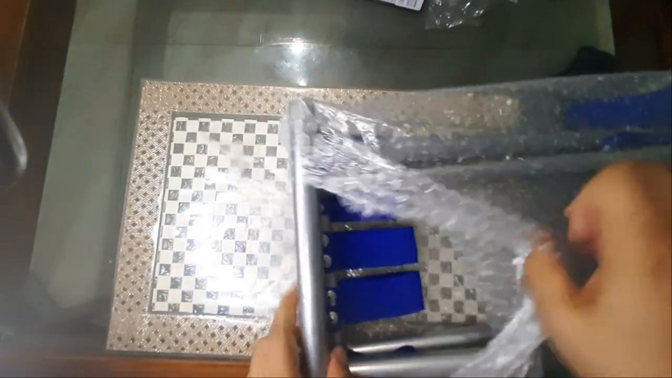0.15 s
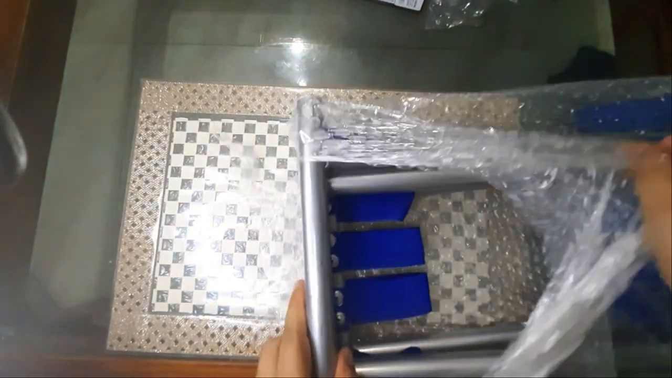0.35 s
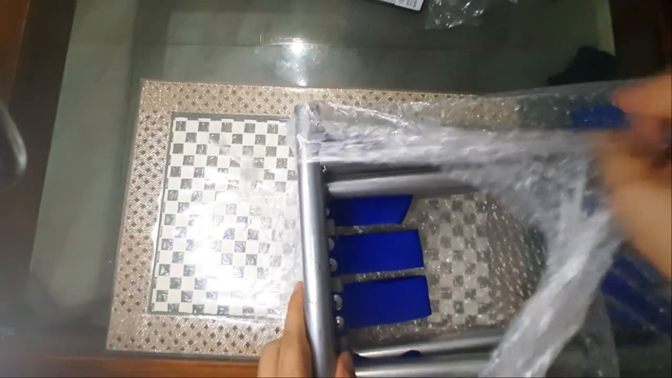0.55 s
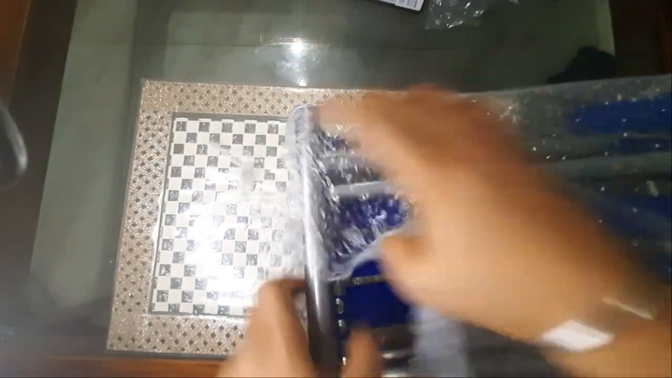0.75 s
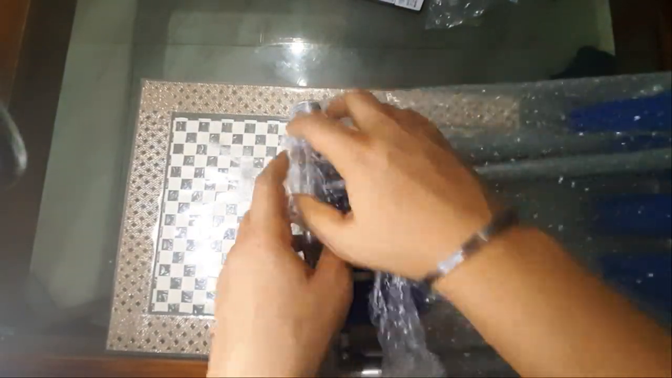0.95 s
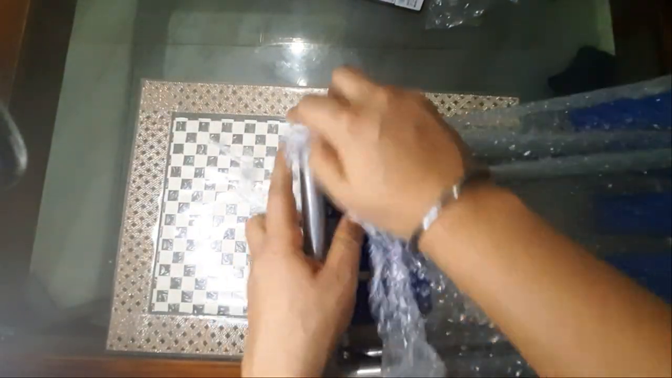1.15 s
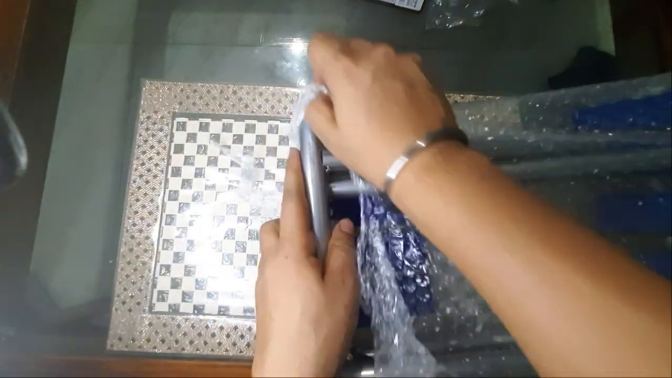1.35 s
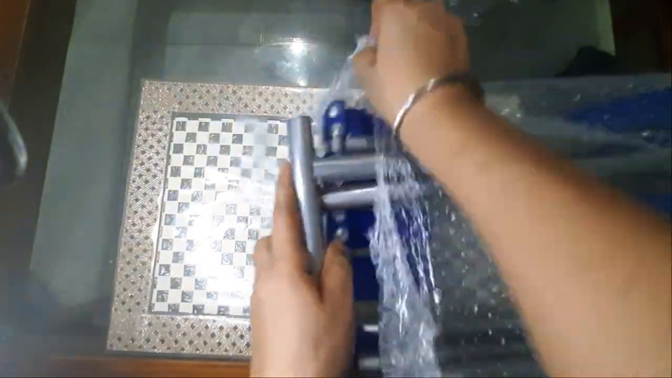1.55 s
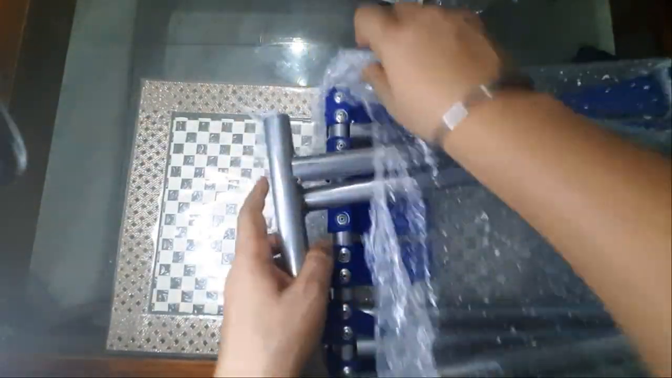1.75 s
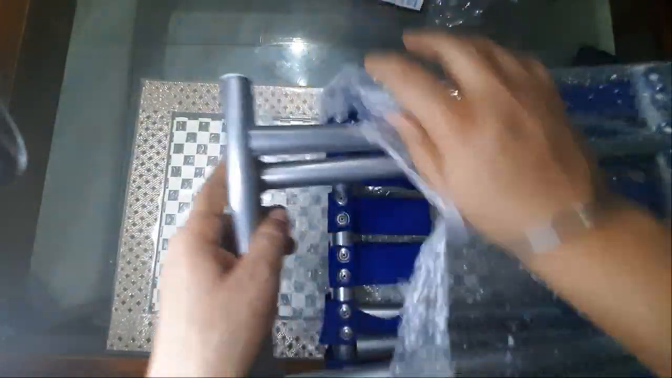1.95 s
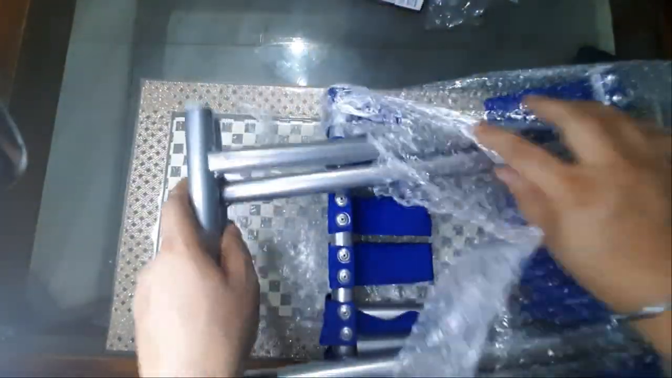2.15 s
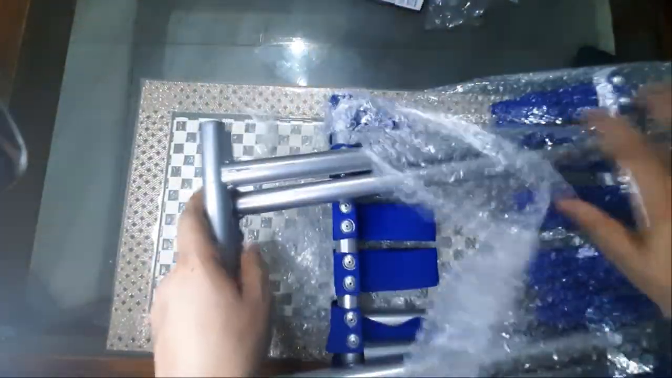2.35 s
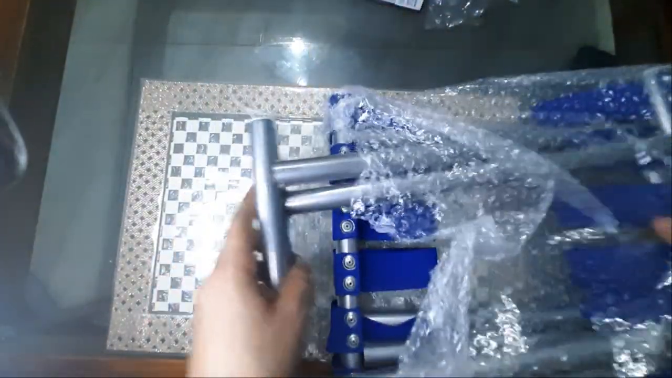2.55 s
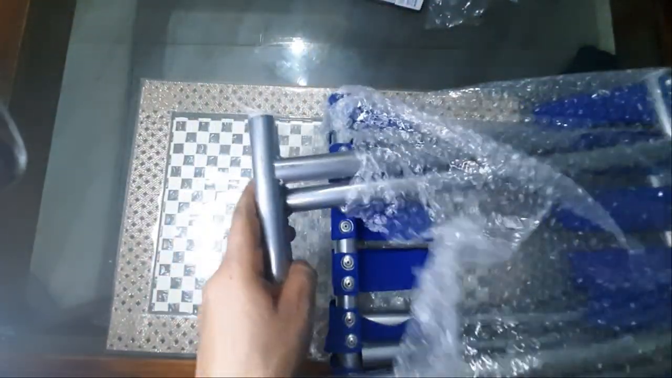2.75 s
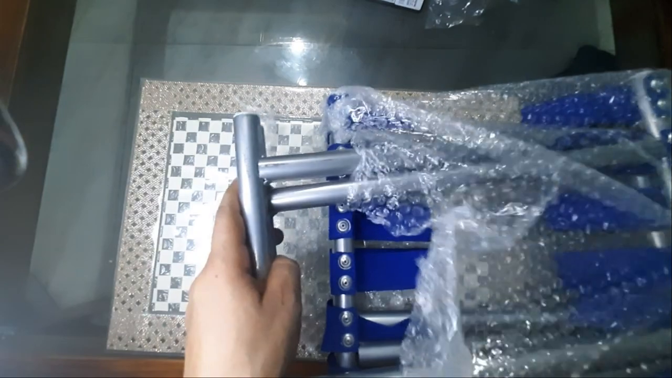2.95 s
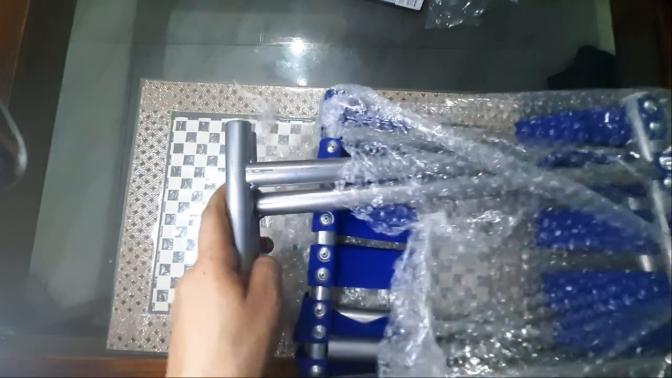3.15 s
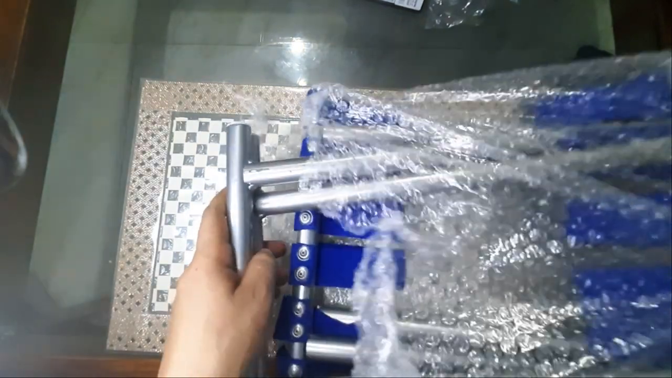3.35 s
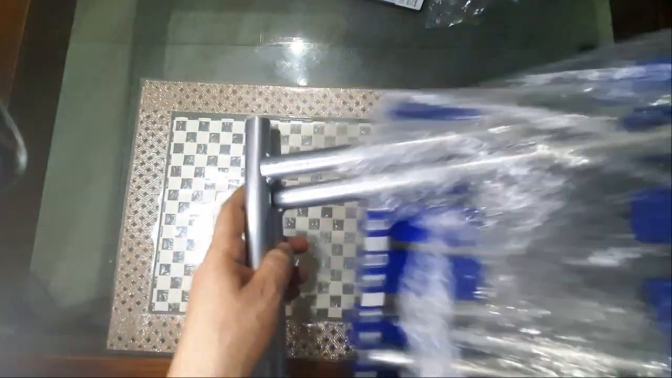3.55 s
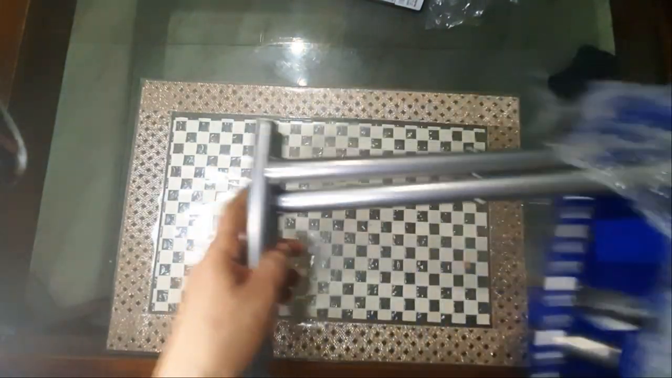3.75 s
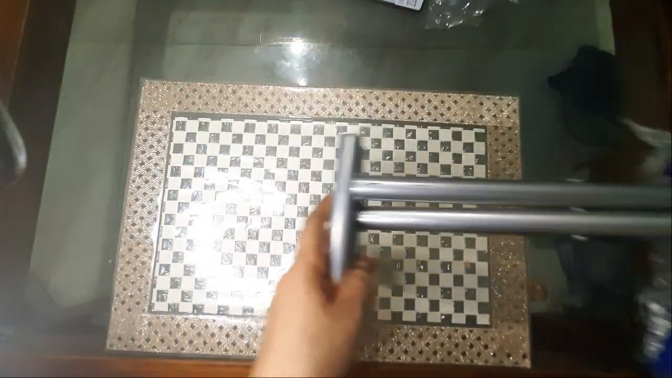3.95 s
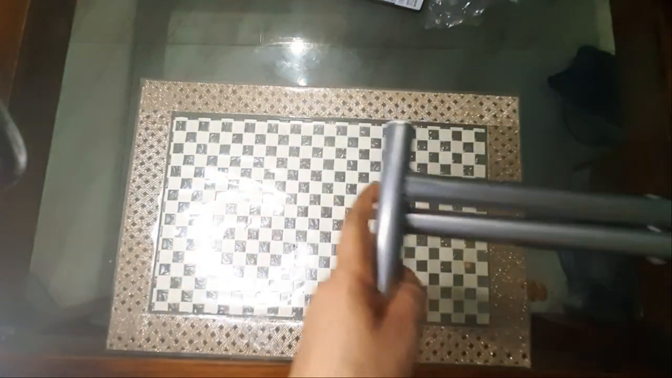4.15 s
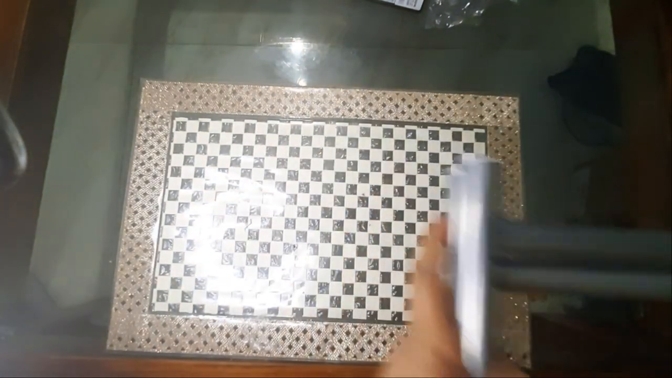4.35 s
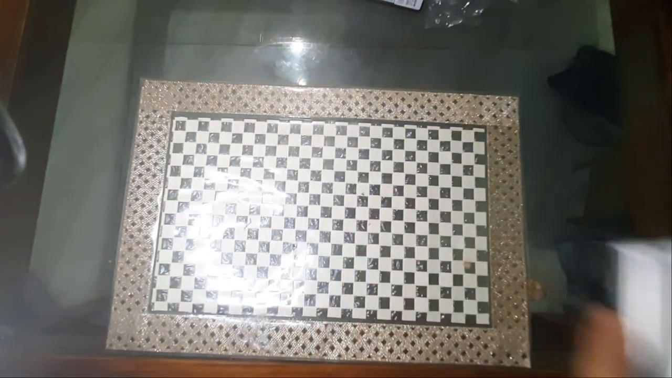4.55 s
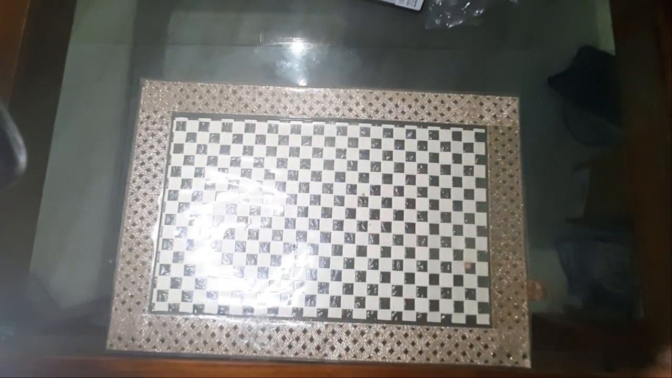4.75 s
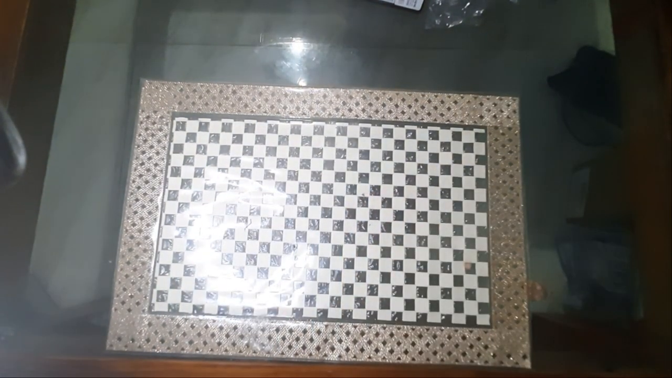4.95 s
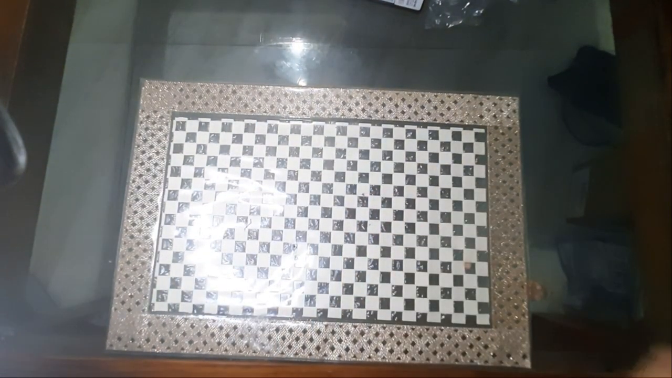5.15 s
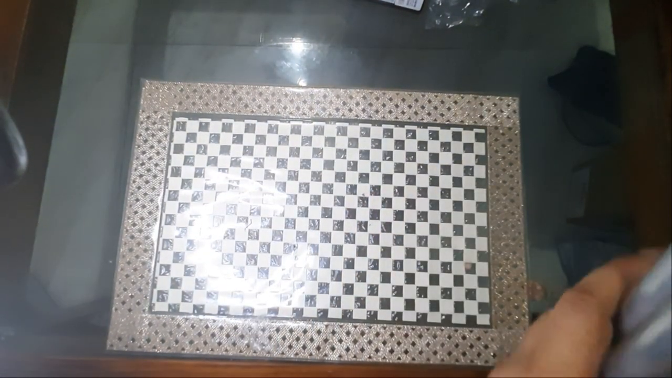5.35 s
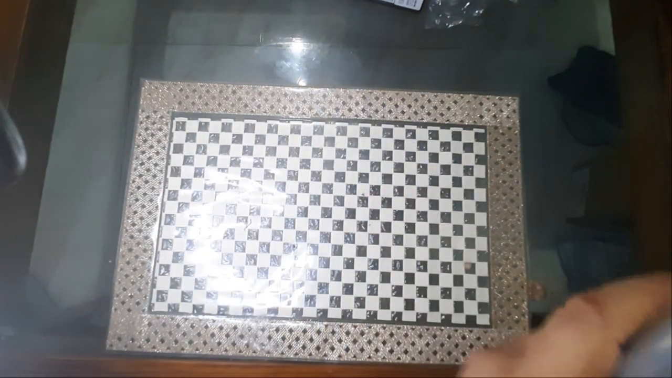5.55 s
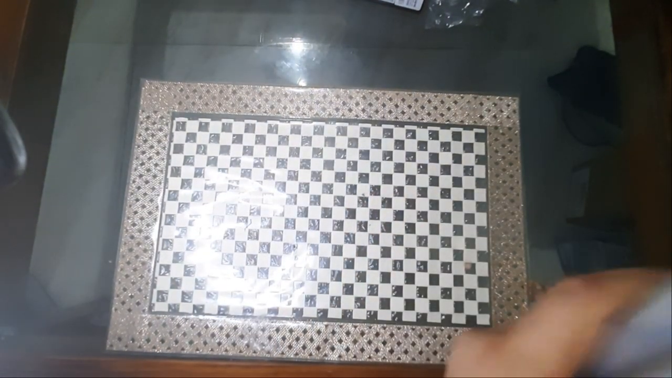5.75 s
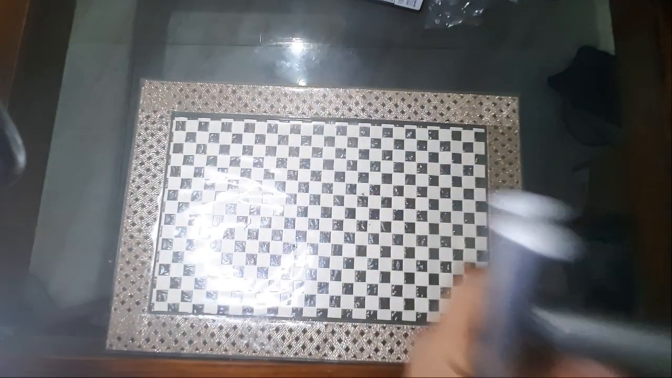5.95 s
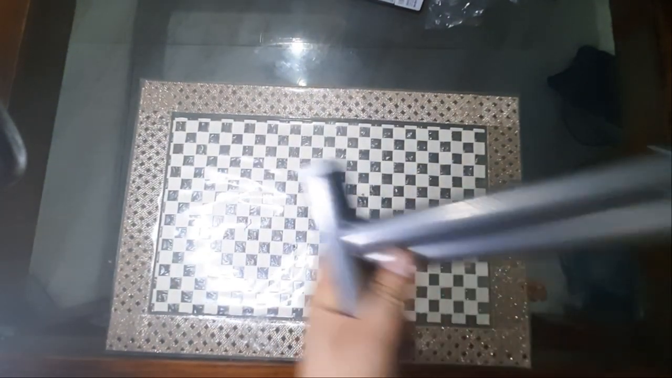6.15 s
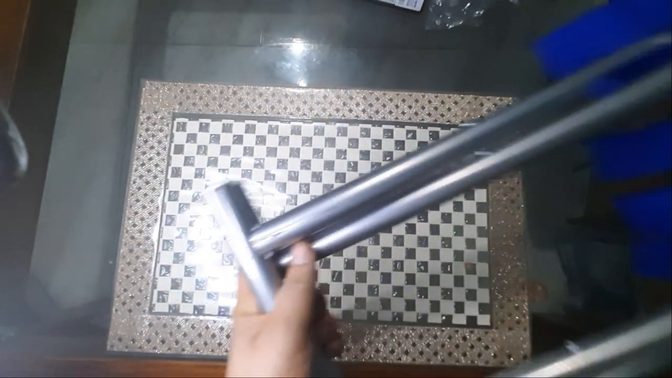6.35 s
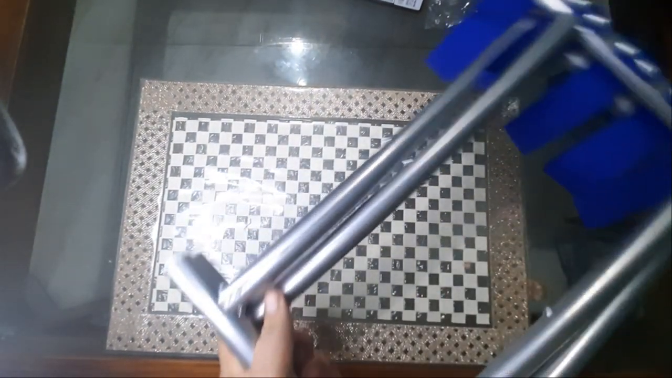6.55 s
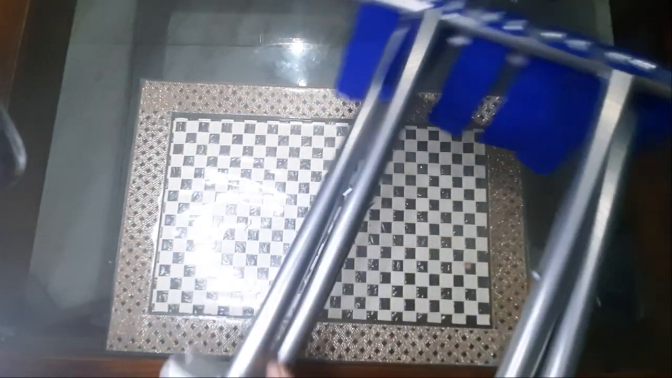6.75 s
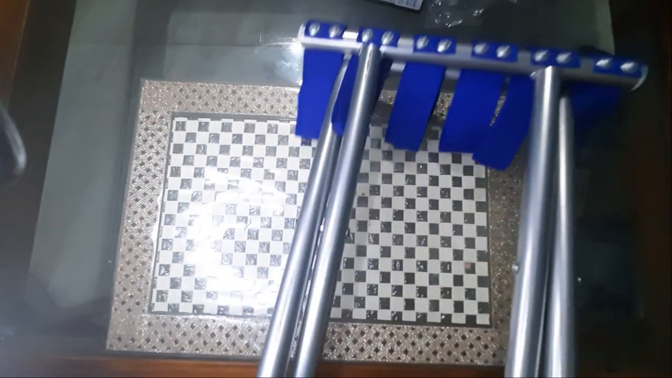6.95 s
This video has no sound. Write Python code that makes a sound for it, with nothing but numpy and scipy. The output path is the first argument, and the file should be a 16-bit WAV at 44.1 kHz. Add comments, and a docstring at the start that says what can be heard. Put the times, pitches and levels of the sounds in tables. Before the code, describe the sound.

Close up in a small room, bubble wrap is tugged off a tubular metal frame on a glass table. Crisp crinkling comes in short bursts with sharp snaps; the tubes knock heavily once at about 1.5 seconds. A long loud pull bursts with cracks, then quieter scrapes, a clack and a light tap follow, and a dull thump as the frame swings back.

```python
"""In a small room, bubble wrap is peeled off a tubular metal frame that lies on a glass table.
The film crinkles in dense tiny buckles, coloured noise clicks of uneven size, and now and then snaps loudly.
The tubes knock on the glass, once heavily, as decaying modes with a clatter of noise; they also clack and scrape.
The freed frame is slid away and swung back with a dull rumble of low buckles."""
import sys
import numpy as np
from scipy import signal
from scipy.io import wavfile

SR = 44100
rng = np.random.default_rng(int(sys.argv[2]) if len(sys.argv) > 2 else 0)


def persist_wave(psi):
    """Save psi, clipped to +-1, as 16-bit WAV."""
    counts = np.round(np.clip(psi, -1, 1) * 32767).astype(np.int16)
    wavfile.write(sys.argv[1], SR, np.atleast_2d(counts).T)


N = 312669
TIME = np.arange(N) / SR
CUTOFF_HZ = 16200


def from_db(db):
    """Level in dB to amplitude."""
    return 10 ** (np.asarray(db) / 20)


def rms_one(x):
    """Scale a sound to an rms of 1."""
    return x / np.sqrt(np.mean(x ** 2) + 1e-20)


def in_time(rows):
    """Each column of a curve, sample by sample."""
    times, *columns = np.transpose(rows)
    return [np.interp(TIME, times, column) for column in columns]


def at_hz(points, hz):
    """A spectrum read on a log-frequency axis."""
    point_hz, values = np.transpose(points)
    return np.interp(np.log(hz), np.log(point_hz), values)


def add(out, s, sound):
    """Mix a short sound in at time s."""
    start = max(round(s * SR), 0)
    out[start:start + len(sound)] += sound[:max(N - start, 0)]


def passband(x, low_hz, high_hz):
    """A band with steep edges."""
    return signal.sosfilt(signal.butter(5, [low_hz, high_hz], "band", fs=SR, output="sos"), x)


def bands(low_hz, high_hz):
    """Centres and band-pass filters, half an octave wide, that cover a range."""
    centres = 16000 / 2 ** np.arange(0, 9.6, .5)
    covering = [hz for hz in centres if low_hz / 1.2 < hz < high_hz * 1.2]
    half_width = 2 ** .25
    return [(hz, signal.butter(2, [hz / half_width, hz * half_width], "band", fs=SR, output="sos"))
            for hz in covering]


def coloured(spectrum, excite):
    """Sum of bands, each fed by excite(hz) and weighted by the spectrum; rms 1."""
    total = 0
    for hz, sos in bands(spectrum[0][0], spectrum[-1][0]):
        total = total + from_db(at_hz(spectrum, hz)) * signal.sosfilt(sos, excite(hz) + 1e-18)
    return rms_one(total)


def drift(per_s):
    """Random values, per_s of them a second, joined by straight lines; spread near 1."""
    return np.interp(TIME * per_s, np.arange(4096), rng.standard_normal(4096))


def ring(hz, t60, t):
    """A struck mode: a sine that fades by 60 dB in t60 seconds."""
    return np.sin(2 * np.pi * hz * t) * from_db(-60 * t / t60)


def resonance(x, hz, width_hz):
    """One narrow resonance driven by x."""
    return signal.lfilter(*signal.iirpeak(hz, hz / width_hz, fs=SR), x)


def dying(strikes, t60):
    """Each strike starts an exponential fade."""
    return signal.lfilter([1], [1, -from_db(-60 / (t60 * SR))], strikes + 1e-18)


def jerk(attack_s):
    """A quick, straight rise."""
    return np.linspace(0, 1, int(attack_s * SR))


def swell(swell_s, range_db):
    """A slow rise, even in dB."""
    return from_db(np.linspace(-range_db, 0, int(swell_s * SR)))


def stroke(rise, hold_s, release_s):
    """A movement of the hand: it rises, holds and fades with the time constant release_s."""
    fade = np.exp(-TIME[:SR // 2] / release_s)
    return np.concatenate([rise, np.ones(int(hold_s * SR)), fade])


def together(strokes):
    """Strength over time of strokes (s, shape, dB), whose powers add."""
    power = np.zeros(N)
    for s, shape, db in strokes:
        add(power, s, (from_db(db) * shape) ** 2)
    return np.sqrt(power)


def buckles(spectrum, per_s, spread_db, clump_db, patchy_db, largest_db):
    """Tiny buckles of uneven size, in bands whose levels drift separately; rms 1."""
    # one crease giving way sets off its neighbours: sudden bursts that fade
    burst_starts = rng.exponential(1, N) * (rng.random(N) < 70 / SR)
    bursts = dying(burst_starts, t60=.04)
    sizes_db = spread_db * rng.exponential(1, N) + clump_db * bursts
    clicks = from_db(np.minimum(sizes_db, largest_db)) * (rng.random(N) < per_s / SR)
    return coloured(spectrum, lambda hz: clicks * rng.standard_normal(N) * from_db(patchy_db * drift(35)))


# short tugs at the film: (time [s], hold [s], crisp crinkle level [dB], crumpling of folds level [dB],
# hollow rub of the bubbles level [dB])
FILM_TUGS = [(0, 0.065, -41, -37.5, -37.5), (0.116, 0.075, -43.5, -47, -44),
             (.195, 0.049, -41.5, -43.5, -38), (.26, 0.14, -41, -44, -41), (0.532, .14, -47.5, -63, -58),
             (0.689, 0.035, -40.5, -51.5, -43.5), (0.768, 0.07, -46, -53, -39),
             (.853, 0.058, -49, -50, -43.5), (.955, .11, -51.5, -74, -55.5), (1.094, .11, -45, -64, -49),
             (1.224, 0.037, -38.5, -49, -38.5), (1.329, 0.11, -44.5, -48, -47.5),
             (1.432, .11, -36.5, -34, -33.5), (1.597, 0.065, -60, -46.5, -41),
             (1.688, .04, -55, -54, -47.5), (1.795, 0.035, -44, -61, -41.5),
             (1.867, 0.051, -43.5, -59, -42), (1.934, 0.11, -43, -63, -44.5),
             (2.038, 0.057, -41.5, -57, -38), (2.182, .02, -41.5, -35.5, -32.5),
             (2.309, 0.029, -43.5, -52.5, -41), (2.43, 0.13, -50.5, -66, -44.5),
             (2.588, 0.077, -48, -51.5, -43), (2.702, .03, -51, -56, -46), (2.863, 0.11, -45.5, -53, -47),
             (2.995, 0.055, -42, -43.5, -37), (3.10, 0.033, -48, -45, -50), (3.194, 0.074, -44, -50.5, -43),
             (3.296, 0.036, -42.5, -48, -39.5), (3.344, 0.15, -46, -56, -47.5), (4.406, .02, -44, -45, -41),
             (4.634, 0.053, -40.5, -38, -43), (4.72, .10, -49.5, -48.5, -48.5),
             (4.828, 0.032, -51, -46, -48), (4.89, 0.16, -52.5, -53.5, -53.5),
             (5.155, 0.069, -53, -52, -59), (5.912, 0.028, -58, -72, -77),
             (6.112, 0.052, -45.5, -42.5, -71), (6.216, 0.13, -49, -41, -42), (6.377, 0.036, -60, -54, -54),
             (6.657, 0.027, -58, -61, -42.5)]
# long pulls that swell up: (time [s], swell [s], hold [s], crisp level [dB], folds level [dB],
# hollow level [dB])
FILM_PULLS = [(3.421, 0.11, 0.26, -32.5, -34.5, -31), (4.164, 0.089, .02, -41, -53, -48),
              (5.339, .15, .02, -42.5, -42, -55), (5.523, .11, 0.016, -43.5, -40.5, -48.5),
              (6.804, 0.3, .04, -39.5, -41.5, -49.5)]
# rustle of the loose sheet under the strokes: (time [s], level of its crisp part [dB])
SHEET_RUSTLE = [(0, -38.5), (.5, -60), (1.4, -52), (2.4, -52), (3.4, -52), (4.0, -55), (5.62, -49.5),
                (5.76, -67), (6.09, -71), (6.25, -52), (7.09, -49)]


def handling():
    """How hard the film crinkles, crumples and rubs: tugs and pulls over a faint rustle."""
    moves = []
    for s, hold_s, *levels_db in FILM_TUGS:
        moves.append((s, stroke(jerk(attack_s=.01), hold_s, release_s=.029), levels_db))
    for s, swell_s, hold_s, *levels_db in FILM_PULLS:
        moves.append((s, stroke(swell(swell_s, range_db=18.5), hold_s, release_s=.024), levels_db))
    rustle_db, = in_time(SHEET_RUSTLE)
    strengths = []
    # rustle in the crisp, folded and hollow parts, dB relative to the crisp one
    for part, share_db in enumerate((0, -13.5, -9)):
        strokes = together((s, shape, levels_db[part]) for s, shape, levels_db in moves)
        strengths.append(np.hypot(strokes, from_db(rustle_db + share_db)))
    return strengths


# colour of the crinkle: (time [s], level of its lowest band [dB], level of its top treble [dB])
CRINKLE_TILT = [(0, -14, 7.5), (.55, -16, 2.5), (.8, -3.5, 3), (1.9, 7.5, 2), (2.75, -17, -1.5),
                (3.1, -2, 2), (3.7, 1, 4.5), (4.05, -16, -1), (4.55, -18, 5.5), (4.7, 7.5, 7.5),
                (5.65, -6, 6.5), (6.1, 7.5, -30), (6.3, 4, 1), (6.7, -2.5, -13), (7.09, 2.5, 0)]
# spectra of the skin, the larger folds and the air cells: (frequency [Hz], relative level [dB])
SKIN_SPECTRUM = [(2200, -7.5), (3800, 3), (5800, 1.5), (7500, 2), (10000, -9), (12000, -17), (16000, -19.5)]
FOLD_SPECTRUM = [(700, -6), (1200, 6), (1700, 4.5), (2500, -2), (3500, 0), (6000, -6.5)]
CELL_SPECTRUM = [(130, -13), (250, -7.5), (400, 2.5), (550, 1.5), (780, -4), (1100, -10), (1500, -13)]


def crinkling(crinkle, crumple, rub, low_hz=2350, middle_hz=3350, treble_hz=9800):
    """The skin crackles brightly, larger folds crumple lower, and air cells rub hollowly along the tubes."""
    low_db, treble_db = in_time(CRINKLE_TILT)
    skin = buckles(SKIN_SPECTRUM, per_s=3600, spread_db=2.4, clump_db=2.8, patchy_db=1.1, largest_db=16)
    # the crinkle's low edge and its top treble change in level over time
    low = from_db(low_db) * passband(skin, low_hz, middle_hz)
    middle = passband(skin, middle_hz, treble_hz)
    treble = from_db(treble_db) * passband(skin, treble_hz, CUTOFF_HZ)
    folds = buckles(FOLD_SPECTRUM, per_s=2400, spread_db=1.5, clump_db=4.5, patchy_db=3.0, largest_db=9)
    cells = buckles(CELL_SPECTRUM, per_s=1800, spread_db=1.74, clump_db=2.5, patchy_db=2.0, largest_db=10.5)
    return crinkle * (low + middle + treble) + crumple * folds + rub * passband(cells, 77, 1420)


# shoves of the frame over the table: (time [s], hold [s], rumble level [dB])
FRAME_SHOVES = [(0, 0.029, -43.5), (.33, .15, -58.5), (0.208, .03, -51), (0.976, 0.085, -52),
                (1.61, .02, -43), (2.59, .04, -53), (2.997, 0.09, -47), (3.205, .04, -46), (3.6, .09, -46),
                (4.237, .1, -54.5), (4.627, 0.052, -48.5), (5.454, 0.033, -45.5), (5.62, .1, -58),
                (6.226, 0.057, -34.5), (6.32, 0.056, -49), (6.55, 0.17, -49.5), (6.65, 0.022, -46)]
# spectrum of the juddering frame: (frequency [Hz], relative level [dB])
RUMBLE_SPECTRUM = [(25, -40.5), (45, -12.5), (65, 7), (100, -4.5), (170, -8), (260, -5.5), (500, -23.5)]


def rumble(rub, drag_db=-16):
    """The frame judders over the table top when it is shoved or the film drags at it."""
    shoves = together((s, stroke(jerk(attack_s=.022), hold_s, release_s=.037), db)
                      for s, hold_s, db in FRAME_SHOVES)
    judder = buckles(RUMBLE_SPECTRUM, per_s=450, spread_db=2.0, clump_db=2.5, patchy_db=3.0, largest_db=8)
    # the drag follows the hollow rub of the film
    return np.hypot(shoves, from_db(drag_db) * rub) * judder


# spectrum of the still air: (frequency [Hz], relative level [dB])
AIR_SPECTRUM = [(25, 1), (70, 19.5), (200, 9.5), (600, 2), (1500, 0.5), (3000, -23), (6000, -20),
                (9000, -110), (12000, -53), (16000, -32)]


def still_air(level_db=-60.5):
    """A steady, faint bed of coloured noise."""
    return from_db(level_db) * coloured(AIR_SPECTRUM, lambda hz: rng.standard_normal(N))


# snaps of the film: (time [s], pitch of the crack [Hz], crack level [dB],
# lower crack of a wider patch level [dB], hollow pop of the air cell level [dB])
FILM_SNAPS = [(0.0706, 3200, -22, -9, -32), (.161, 5040, -33, -50, -47), (.259, 6000, -25, -45, -48),
              (0.4026, 4900, -3, -7, -11.5), (.4103, 10000, -14, -40, -47), (.4307, 8000, -19, -40, -49),
              (0.537, 5170, -28, -48, -40), (.7838, 3050, -23, -28, -34), (1.0195, 6500, -26, -52, -56),
              (1.187, 5800, -21, -48, -50), (1.415, 6000, -20, -44, -53), (1.2375, 2970, -9, -12, -16.5),
              (1.3366, 5440, -5, -21, -17), (1.4399, 3170, -1, -20, -19), (2.012, 3700, -17, -38, -48),
              (2.188, 4500, -17, -31, -36), (2.328, 4200, -23, -45, -48), (2.4515, 4840, -27, -48, -48),
              (3.086, 9100, -19, -32, -38), (3.3072, 4000, -34, -40, -18.5), (3.569, 4300, -4.5, -14, -19),
              (3.5903, 3980, -5, -11, -21), (3.755, 5760, -7, -18, -24), (3.8058, 4280, 1.5, 0, -23),
              (4.6412, 5700, -4, -10.5, -38), (4.6963, 3780, -11, -18.5, -28),
              (4.7095, 5500, -21, -34, -48), (4.777, 5000, -21, -32, -42), (4.8362, 8850, -17, -30, -43),
              (5.0028, 6500, -19.5, -32, -47), (5.072, 7500, -25.5, -42, -55),
              (5.286, 2960, -28.5, -35, -55), (5.4839, 3500, -18, -14, -43),
              (5.646, 3530, -16.5, -21.5, -29), (6.117, 2960, -24.5, -34.5, -54),
              (6.1278, 3520, -21.5, -34, -53), (6.208, 3700, -27, -23, -42), (7.052, 3000, -26.5, -33, -38)]


def snaps(pop_hz=520, pop_t60=.0096, crack_cycles=7, wide_ratio=.41, wide_cycles=6.8):
    """A crease lets go: a sharp crack, a few milliseconds of fluttering film, a hollow pop of the air cell."""
    out, t = np.zeros(N), TIME[:2048]
    cell = ring(pop_hz, pop_t60, t) - from_db(-3) * ring(1180, pop_t60 / 2, t)
    flutter_fade = from_db(-12 - 60 * t / .011)
    for s, hz, crack_db, wide_db, pop_db in FILM_SNAPS:
        around = signal.butter(1, [hz * .82, hz * 1.3], "band", fs=SR, output="sos")
        flutter = rms_one(signal.sosfilt(around, rng.standard_normal(len(t)))) * flutter_fade
        # each crack lasts a fixed number of cycles of its own pitch
        crack_t60 = crack_cycles / hz
        upper_hz, wide_hz = min(hz * 1.9, CUTOFF_HZ), hz * wide_ratio
        patch = 1.11 * ring(hz, crack_t60, t) - from_db(-4) * ring(upper_hz, crack_t60, t)
        # a small patch of film radiates little below its own pitch
        small = signal.butter(2, hz * .5, "high", fs=SR, output="sos")
        crack = signal.sosfilt(small, patch + flutter)
        wide = ring(wide_hz, wide_cycles / wide_hz, t)
        add(out, s, from_db(crack_db) * crack + from_db(wide_db) * wide + from_db(pop_db) * cell)
    return signal.sosfilt(signal.butter(2, [340, 11000], "band", fs=SR, output="sos"), out)


# modes of the frame and of the table top: (frequency [Hz], level [dB], t60 [s])
FRAME_MODES = [(551, 0, .28), (717, -8, .26), (753, -11, .22), (355, -18, .25), (432, -14, .14),
               (468, -15, .18), (517, -14, .22), (870, -21, .2), (1053, -16, .15), (1226, -17, .18),
               (1264, -16, .22), (1425, -19, .2), (1710, -26, .16), (2120, -27, .18)]
TABLE_MODES = [(64.6, -19, .4), (109.5, -13, .33), (141, -24, .25), (175.9, -8.5, 0.346)]
# spectrum of the crowded high modes: (frequency [Hz], relative level [dB])
CLATTER_SPECTRUM = [(100, -0.5), (300, -6.5), (650, 1.5), (1400, -3.5), (2600, -8.5), (5500, -11),
                    (8000, -15.5), (10200, -20.5), (12500, -23), (16000, -39)]
# tubes knock on the glass: (time [s], ring level [dB], table boom level [dB], clatter level [dB])
TUBE_KNOCKS = [(.216, -34.5, -50, -34), (.780, -39, -46, -35), (.865, -36, -31.5, -33.5),
               (1.459, -24.5, -25, -28.5), (1.493, -20.5, -32, -20.5), (1.503, -21.5, -40, -14),
               (1.510, -24, -20, -20), (1.525, -42, -10.5, -15.5), (1.536, -41, -26, -13.5),
               (1.587, -51, -47, -19.5), (1.597, -42, -46, -28), (1.870, -35, -57, -62),
               (2.188, -34, -38, -24.5), (2.200, -25, -24.5, -41), (2.625, -44, -44, -41),
               (2.713, -38, -47, -48), (3.054, -23.5, -30, -32), (3.064, -30.5, -39, -36.5),
               (3.205, -31, -54, -63), (3.308, -51, -43, -49), (3.6685, -17.5, -36, -22.5),
               (6.229, -57, -48, -33.5), (6.263, -56, -39, -37), (6.672, -54, -50, -46)]


def struck(modes, t):
    """A blow on a body: its modes ring in alternating sign, each a little louder or softer by chance."""
    total = np.zeros(len(t))
    for k, (hz, db, t60) in enumerate(modes):
        total += (-1) ** k * from_db(db + 1.3 * rng.normal()) * ring(hz, t60, t)
    return total


def knocks(clatter_t60=.059, damping=.16, zing_db=4):
    """Each blow rings the frame and the table top, and its crowded high modes clatter briefly."""
    out, blows, t = np.zeros(N), np.zeros(N), TIME[:SR // 2]
    for s, ring_db, boom_db, clatter_db in TUBE_KNOCKS:
        add(out, s, from_db(ring_db) * struck(FRAME_MODES, t) + from_db(boom_db) * struck(TABLE_MODES, t))
        add(blows, s, from_db([clatter_db]))

    def fading_noise(hz):
        """The higher the mode, the sooner it dies."""
        return rng.standard_normal(N) * dying(blows, clatter_t60 * (1000 / hz) ** damping)

    clatter = coloured(CLATTER_SPECTRUM, fading_noise)
    # the thin tube wall adds a high metallic zing
    zing = from_db(zing_db) * resonance(clatter, hz=10100, width_hz=450)
    # coloured() levels the clatter, so the strength of the blows is put back
    return out + (clatter + zing) * np.std(dying(blows, clatter_t60))


# a tube scrapes along the table: (time [s], swell [s], hold [s], level [dB])
TUBE_SCRAPES = [(4.18, .07, .02, -46.5), (4.382, 0.042, 0.036, -50.5), (4.64, .04, .05, -52),
                (4.777, 0.04, 0.17, -54.5), (5.14, .04, .3, -59), (5.55, 0.074, .02, -56),
                (6.527, 0.049, 0.15, -62), (6.82, 0.17, .05, -46)]
# resonances of the scraping tube: (frequency [Hz], width [Hz], level [dB])
TUBE_RESONANCES = [(1190, 110, -4), (1496, 100, 0), (1725, 64, 2.5), (1843, 130, -1.5), (2107, 88, -3),
                   (2280, 84, -9)]


def scrape(grip_db=4.0):
    """Uneven friction keeps the resonances of a sliding tube ringing."""
    sliding = together((s, stroke(swell(swell_s, range_db=19), hold_s, release_s=.046), db)
                       for s, swell_s, hold_s, db in TUBE_SCRAPES)
    friction = rng.standard_normal(N) * from_db(grip_db * drift(90))
    tube = np.zeros(N)
    for k, (hz, width_hz, db) in enumerate(TUBE_RESONANCES):
        tube += (-1) ** k * from_db(db) * resonance(friction, hz, width_hz)
    return sliding * rms_one(tube)


# parts of one short clack of the tubes: (time [s], level [dB], pitch [Hz], decay t60 [s])
CLACK_PARTS = [(4.4153, -21.5, 1930, 0.018), (4.417, -23.5, 548, 0.032), (4.4205, -21, 1690, 0.012),
               (4.4248, -22, 2160, 0.015), (4.43, -23, 2000, 0.012)]


def clack():
    """The tubes clack once: a few quickly dying modes that start within milliseconds of each other."""
    out, t = np.zeros(N), TIME[:SR // 4]
    for s, db, hz, t60 in CLACK_PARTS:
        add(out, s, from_db(db) * ring(hz, t60, t))
    return out


# modes of one bright tap on a tube: (frequency [Hz], level relative to the tap [dB], t60 [s])
BRIGHT_TAP_MODES = [(2293, -24, .15), (3661, -21, .15), (4660, -3, .01), (5300, -2, 0.011),
                    (5604, -12.5, 0.11), (5879, -5, .03), (8350, -14, .05)]


def bright_tap(tap_s=5.1553, tap_db=-25.5):
    """One tap on a tube sets off its high modes in alternating sign."""
    out, t = np.zeros(N), TIME[:SR // 4]
    for k, (hz, db, t60) in enumerate(BRIGHT_TAP_MODES):
        add(out, tap_s, (-1) ** k * from_db(tap_db + db) * ring(hz, t60, t))
    return out


# decay of the room: (frequency [Hz], t60 [s])
ROOM_DECAY = [(100, 0.37), (500, 0.2073), (2000, 0.32), (6000, 0.51), (14000, 0.25)]
# colour of its echo: (frequency [Hz], relative level [dB])
ECHO_SPECTRUM = [(100, 5), (500, 3), (1500, 5), (4000, -2), (8000, -1), (15000, 3)]


def room(x, first_echo_s=.0044, build_s=.0035):
    """Dense wall echoes set in after a short gap and die at a rate that depends on pitch."""
    t = TIME[:SR * 3 // 5]
    onset = 1 - np.exp(-np.maximum(t - first_echo_s, 0) / build_s)

    def fading_noise(hz):
        """Echoes of one band."""
        return rng.standard_normal(len(t)) * onset * from_db(-60 * t / at_hz(ROOM_DECAY, hz))

    echo = coloured(ECHO_SPECTRUM, fading_noise)
    return signal.fftconvolve(x, echo / np.sqrt(len(t)))[:N]


def scene():
    """Film, frame and table sound together in the room, over still air."""
    crinkle, crumple, rub = handling()
    film = crinkling(crinkle, crumple, rub) + rumble(rub) + scrape()
    cracks = snaps() + clack() + bright_tap()
    frame = knocks()
    # the sheet is wide and moving, so its crinkles reach the walls by ever-changing paths
    place = 2 * drift(25)
    film_walls = room(film * np.cos(place)) + room(film * np.sin(place))
    walls = from_db(-8) * film_walls + from_db(-14) * room(cracks) + from_db(-10) * room(frame)
    return (film + cracks + frame + walls + still_air())[None]


def record(dry, knee_hz=11500, top_db=-3):
    """The microphone is less sensitive at the very top; the loudest peaks are rounded and the top is cut."""
    body = signal.sosfilt(signal.butter(7, knee_hz, "low", fs=SR, output="sos"), dry)
    top = signal.sosfilt(signal.butter(7, knee_hz, "high", fs=SR, output="sos"), dry)
    heard = body + from_db(top_db) * top
    rounded = 1.1 * np.tanh(heard / 1.1)
    return signal.sosfilt(signal.ellip(9, .1, 80, CUTOFF_HZ, fs=SR, output="sos"), rounded)


dry = scene()
out = record(dry)
persist_wave(out)
```